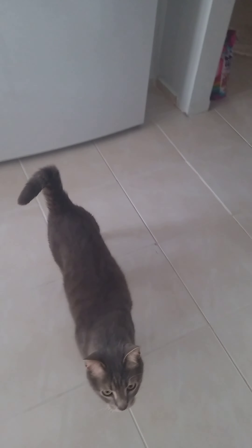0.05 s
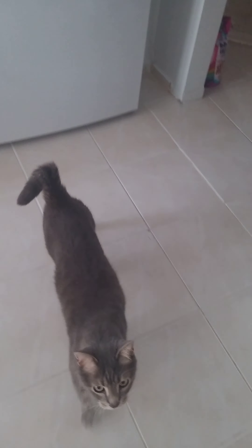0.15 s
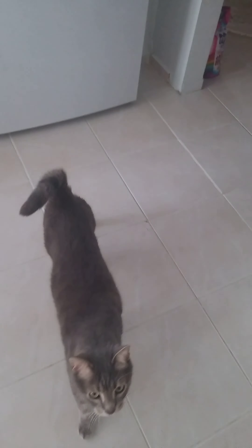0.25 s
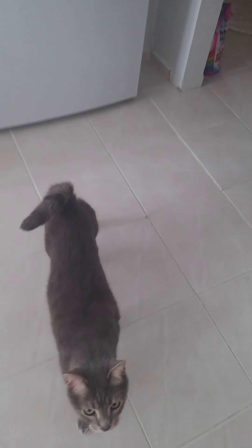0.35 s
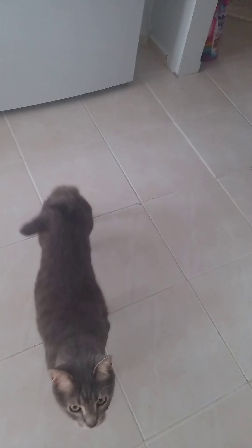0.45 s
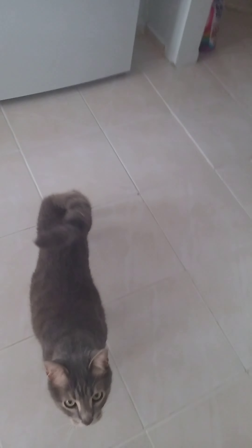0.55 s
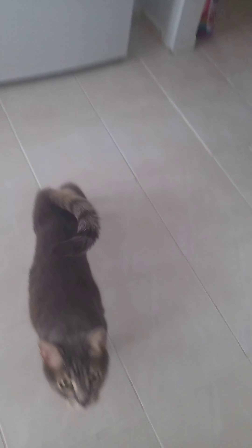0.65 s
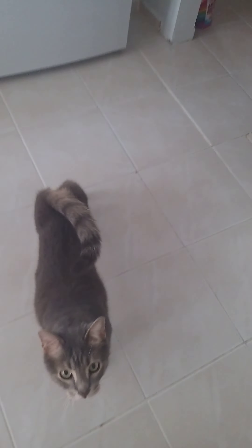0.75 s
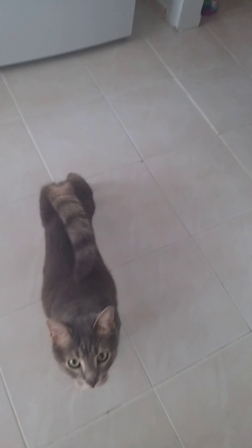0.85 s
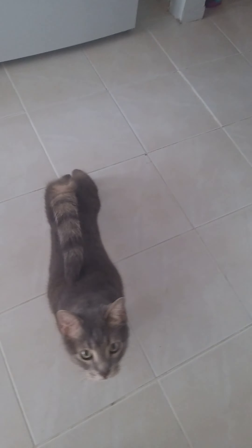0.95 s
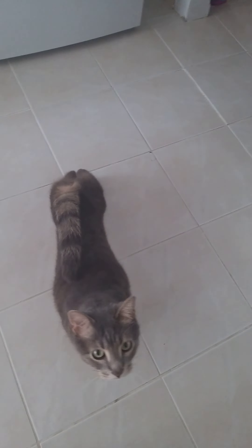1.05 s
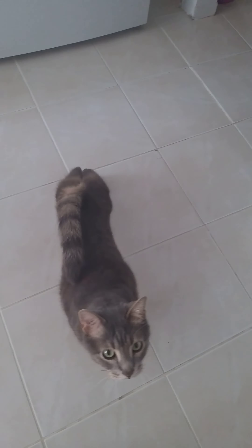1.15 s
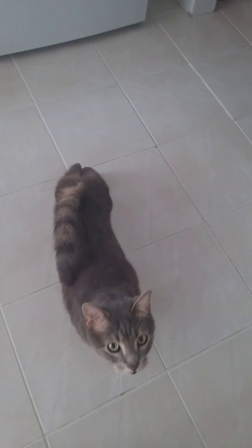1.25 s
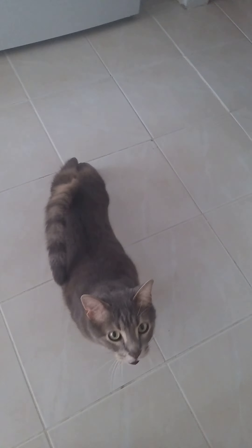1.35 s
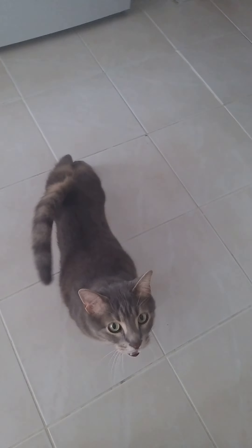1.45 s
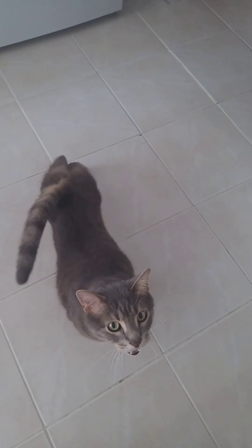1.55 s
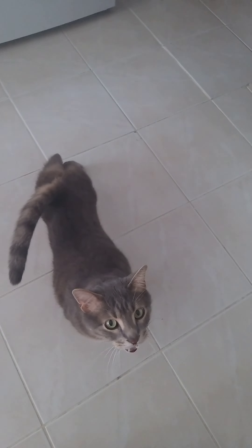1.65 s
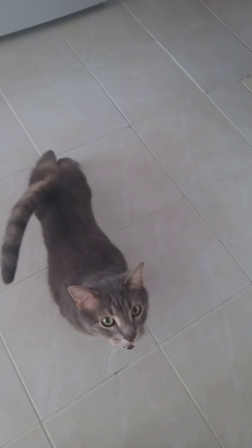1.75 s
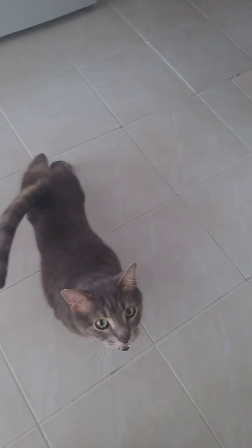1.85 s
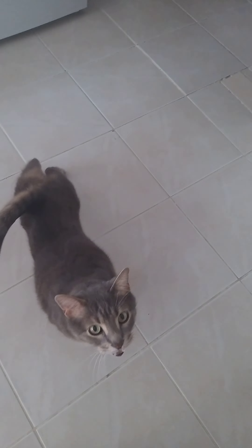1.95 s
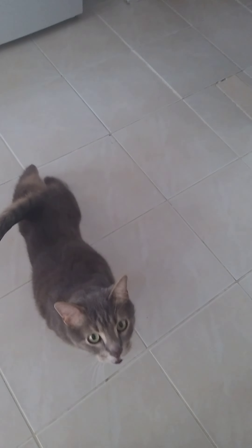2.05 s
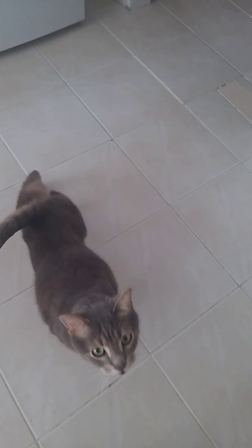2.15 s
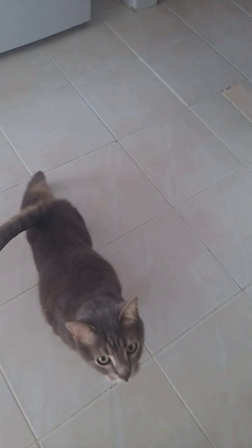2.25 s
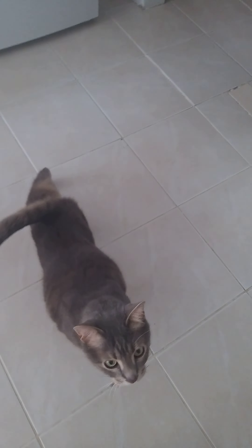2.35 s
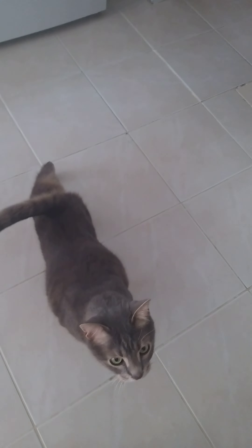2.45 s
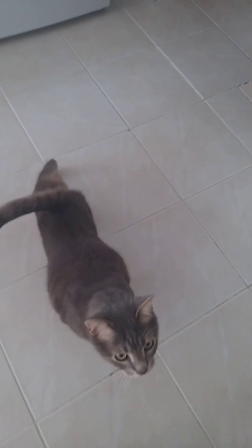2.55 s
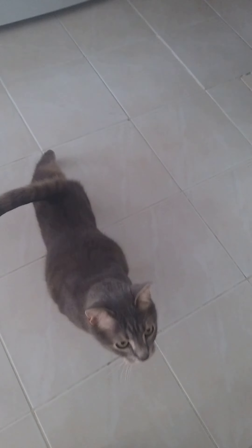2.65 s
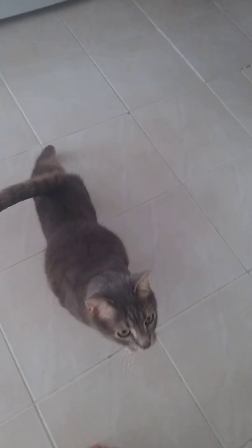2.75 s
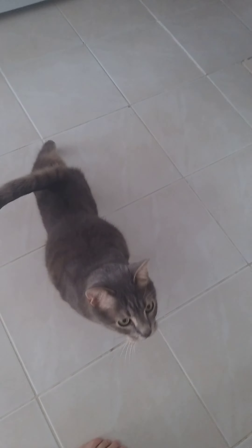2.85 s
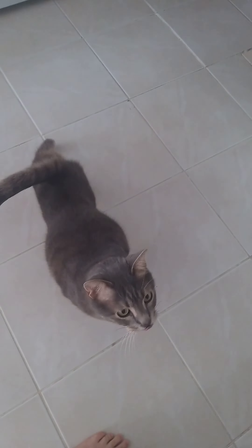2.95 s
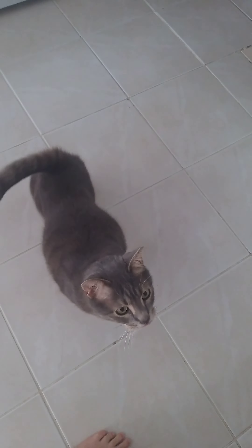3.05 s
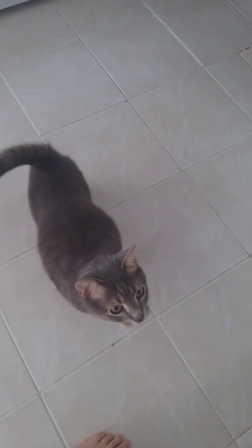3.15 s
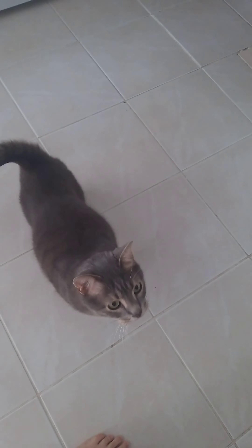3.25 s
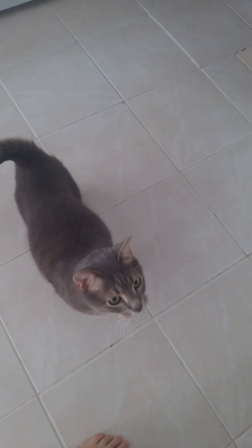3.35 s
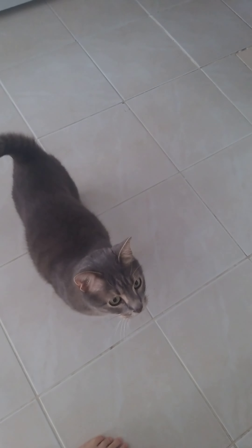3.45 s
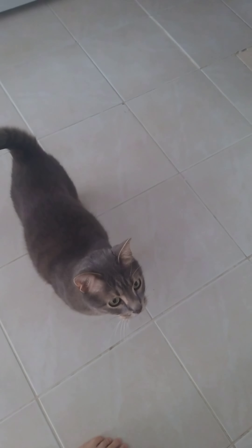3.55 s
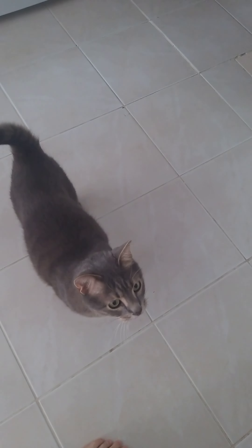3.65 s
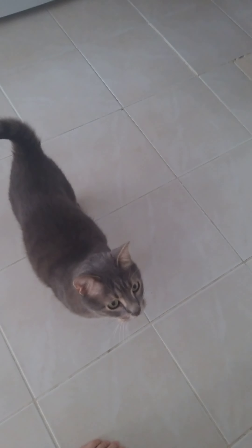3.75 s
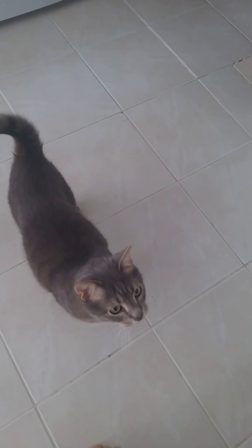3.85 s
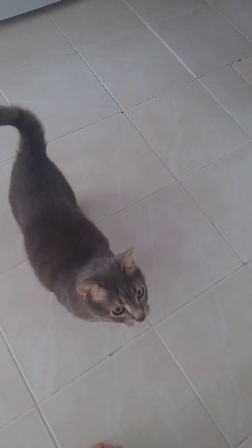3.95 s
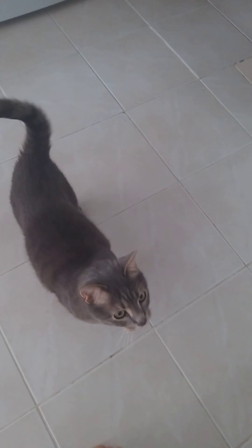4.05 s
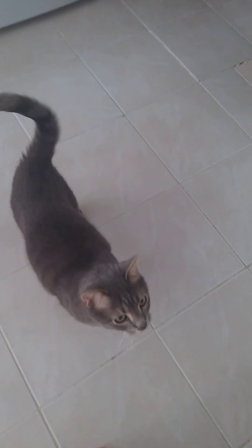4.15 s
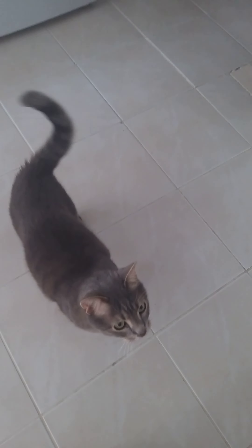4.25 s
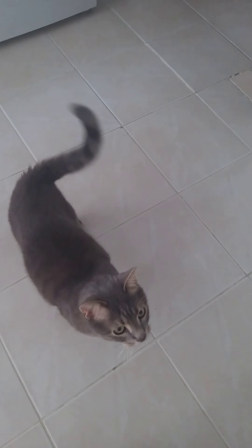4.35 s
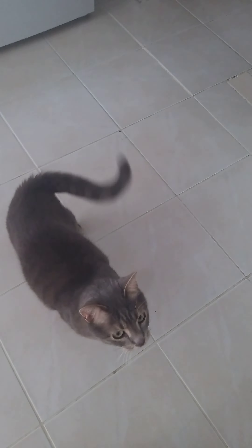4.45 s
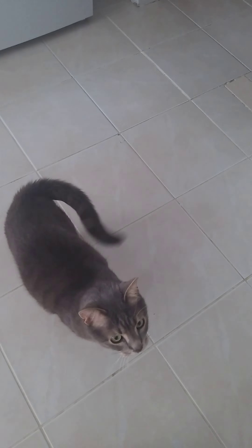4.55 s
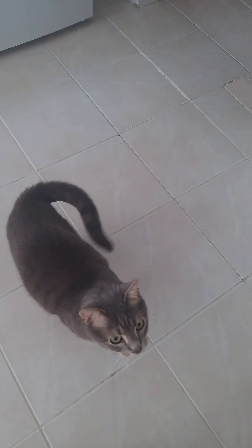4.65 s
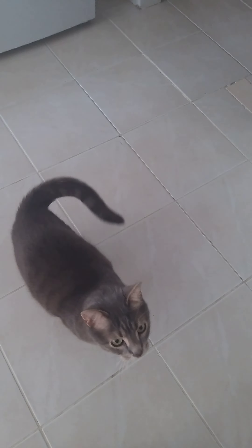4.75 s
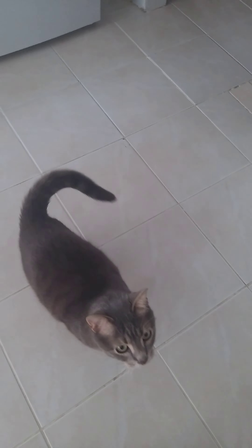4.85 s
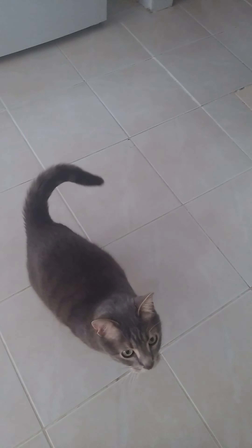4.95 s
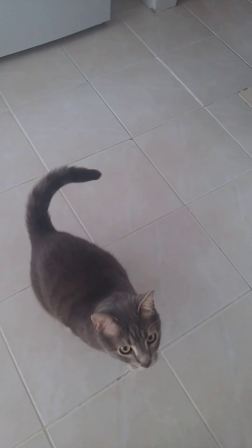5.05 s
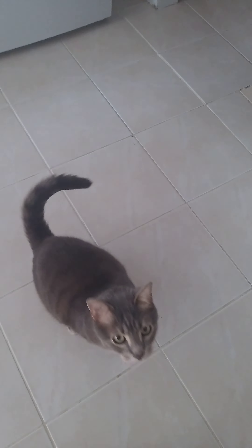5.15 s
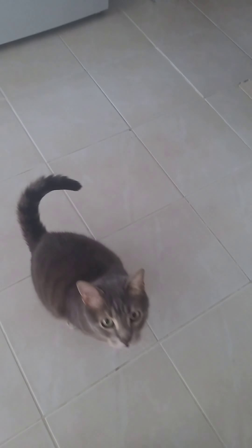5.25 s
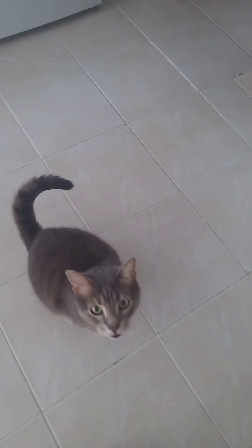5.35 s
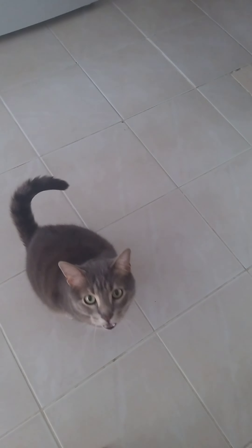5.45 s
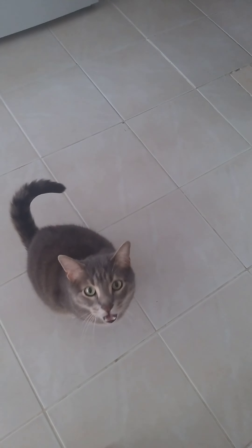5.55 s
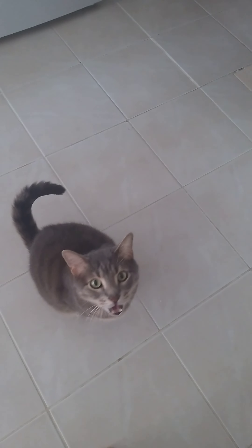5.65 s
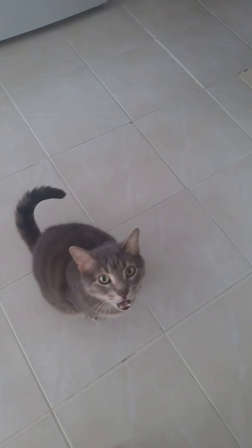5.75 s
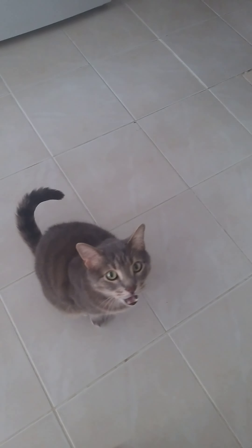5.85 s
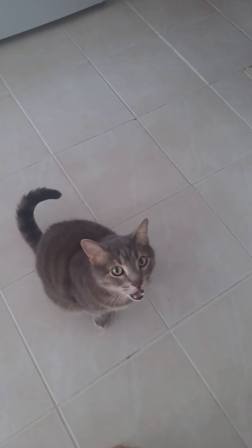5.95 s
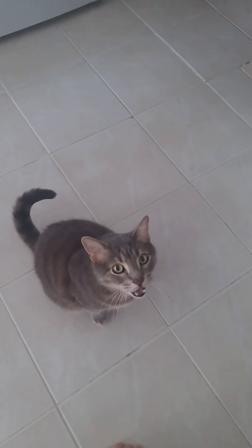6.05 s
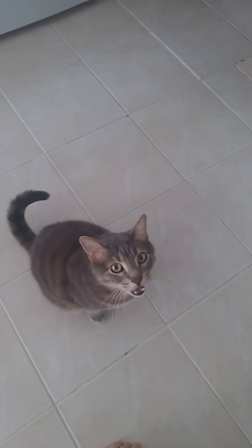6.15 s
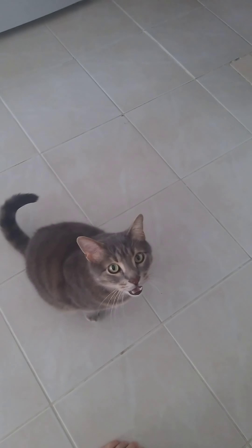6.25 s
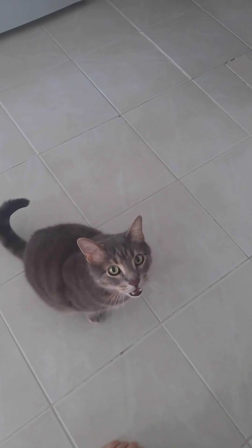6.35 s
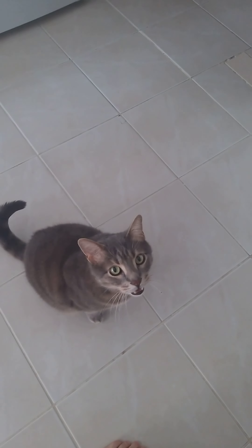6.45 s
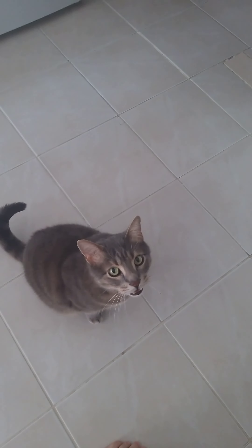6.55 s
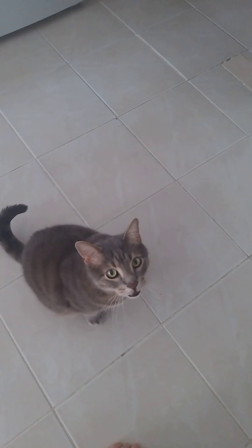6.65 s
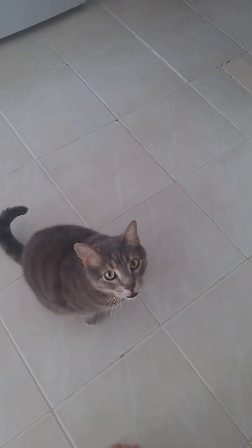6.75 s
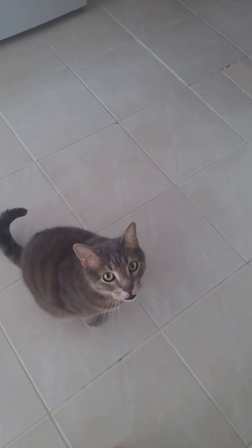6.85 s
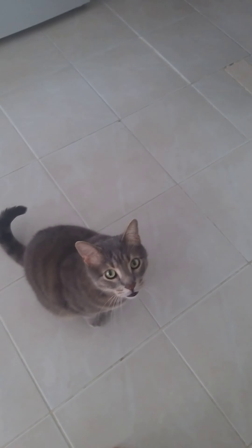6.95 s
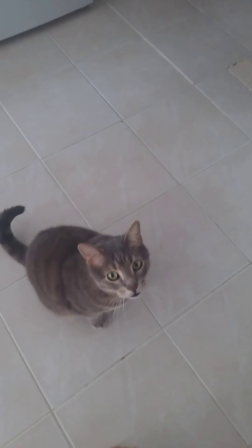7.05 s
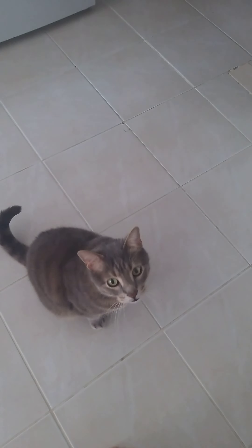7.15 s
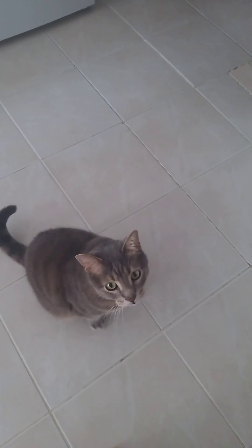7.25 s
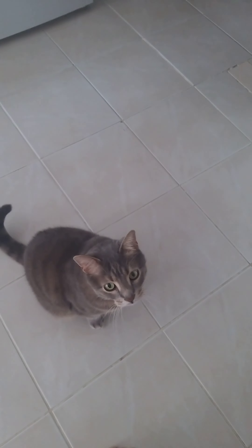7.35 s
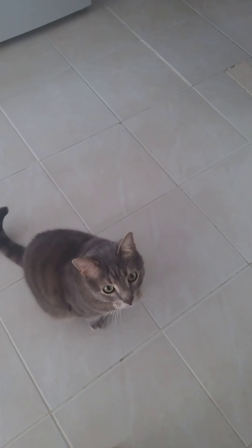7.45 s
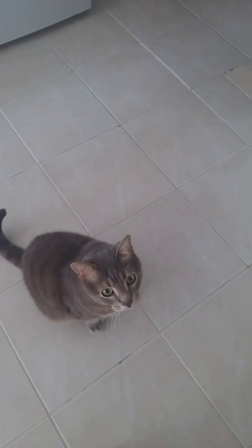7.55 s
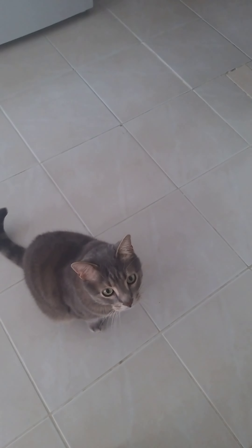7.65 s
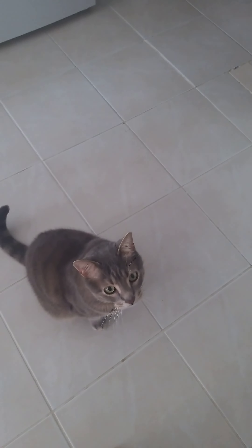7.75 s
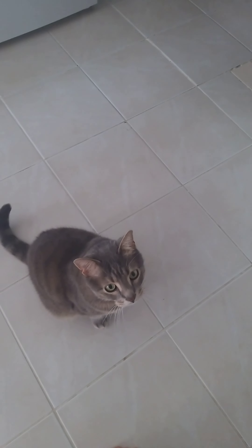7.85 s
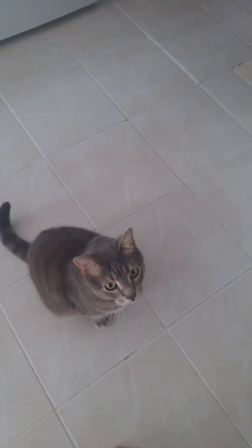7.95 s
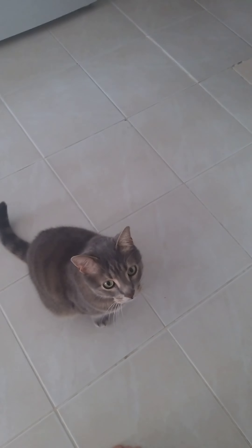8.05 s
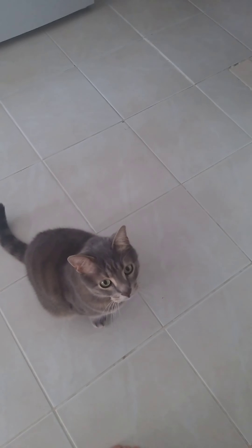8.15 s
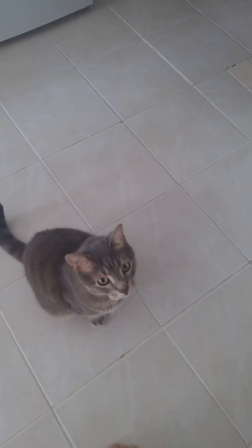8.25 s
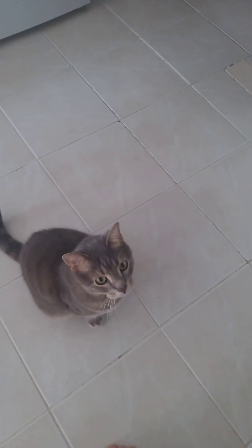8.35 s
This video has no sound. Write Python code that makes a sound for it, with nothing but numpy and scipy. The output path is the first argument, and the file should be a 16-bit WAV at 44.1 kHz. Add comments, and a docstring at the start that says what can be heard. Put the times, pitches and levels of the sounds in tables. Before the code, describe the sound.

A nearby cat gives two long meows in an echoing kitchen, with clanks, knocks and clattering crockery over a fridge hum.

```python
"""A fridge hums over the room tone of a tiled kitchen; some way off, metal clanks and clicks.
A nearby cat meows twice: overtones of its vocal folds, shaped by a mouth that opens and closes.
Taps, knocks and a clatter of crockery follow the first meow; the blows crack and rattle, all but the
taps ring, and most is echo. Two microphone ports of a phone pick it all up, the left one muffled."""
import sys
import numpy as np
from scipy import signal
from scipy.fft import rfft, irfft
from scipy.io import wavfile

SR = 44100
rng = np.random.default_rng(int(sys.argv[2]) if len(sys.argv) > 2 else 0)


def output_pcm(signal):
    """Save a mono or channel-first signal as 16-bit PCM at the path in sys.argv[1].

    Samples are clipped to [-1, 1] before scaling.
    """
    pcm = np.clip(np.atleast_2d(signal).T, -1, 1) * 32767
    wavfile.write(sys.argv[1], SR, np.round(pcm).astype(np.int16))


N = 369999
LEFT_LAG_SAMPLES = 14
# modes of the knocked object, a midrange ring: (frequency [Hz], gain [dB], t60 [s])
KNOCK_MODES = [(346, 0.5, 0.13), (742, 2.5, 0.1), (1440, -20, 0.22), (1584, 1, 0.14), (1675, -8, 0.17),
               (2110, -13, 0.092), (2880, -3, 0.08), (3030, -26, 0.058), (3600, -12.5, 0.13),
               (4050, -20, 0.16), (5100, -14, 0.22), (5500, -14, 0.11)]


def from_db(db):
    """Level to amplitude gain."""
    return 10 ** (np.asarray(db) / 20)


def unit_rms(x):
    """Scale to rms 1."""
    return x / np.sqrt(np.mean(x ** 2) + 1e-20)


def at_hz(points, hz):
    """Read a (frequency, value) table on a log axis."""
    points_hz, values = np.transpose(points)
    return np.interp(np.log(hz + 1), np.log(points_hz), values)


def drift(rate_hz, count):
    """Slow random motion: noise through two one-pole low-passes, rms 1."""
    pole = np.exp(-2 * np.pi * rate_hz / SR)
    noise = rng.standard_normal(count + 8000)
    return unit_rms(signal.lfilter([1], [1, -2 * pole, pole * pole], noise)[8000:])


def band(x, low_hz, high_hz):
    """Butterworth band-pass."""
    return signal.sosfilt(signal.butter(3, [low_hz, high_hz], "band", fs=SR, output="sos"), x)


def diffuse(count):
    """Left and right spectra of diffuse noise, most alike in the bass, and their frequencies."""
    # likeness at the two ports: (frequency [Hz], coherence [0-1])
    coherence = [(60, 0.97), (300, 1), (700, 0.35), (1500, 0.16), (4000, 0.06), (15000, 0.68)]
    hz = np.fft.rfftfreq(count, 1 / SR)
    mid, side = rfft(rng.standard_normal((2, count)))
    alike = np.clip(at_hz(coherence, hz), 0, 1)
    return np.sqrt(1 + alike) * mid + np.sqrt(1 - alike) * side * [[1], [-1]], hz


def room_tone(level_db=-55, waver_db=0.5):
    """Broad, diffuse noise of the house, slightly uneven in level."""
    # noise spectrum: (frequency [Hz], relative density [dB])
    floor = [(18, -47), (30, 1.5), (69, -8), (88, -8), (203, -2), (278, -5), (309, 3), (334, -4.5),
             (434, -7), (626, -10), (1570, -27), (2140, -36), (2860, -28), (4470, -30.5), (15700, -31.5)]
    # humps on it: (centre [Hz], width [Hz], height [dB])
    humps = [(2240, 190, 12.5), (3140, 420, -12.5), (4990, 690, 8), (8600, 230, 4.5), (10040, 940, 5.5),
             (12000, 140, 11)]
    spectra, hz = diffuse(N + N % 2)
    humps_db = sum(db * np.exp(-((hz - centre) / width) ** 2) for centre, width, db in humps)
    noise = irfft(spectra * from_db(at_hz(floor, hz) + humps_db))[:, :N]
    return from_db(level_db + waver_db * drift(12, N)) * unit_rms(noise)


def fridge(steady_hz=700):
    """Compressor hum and a thin whine; the low lines waver most."""
    # hum lines: (frequency [Hz], level [dB])
    lines = [(41, -71.5), (62, -75.5), (99, -73.5), (146, -75.5), (195, -81), (308, -71.5), (370, -69),
             (431, -65.5), (496, -76.5), (2184, -87), (4376, -74.5)]
    t = np.arange(N) / SR
    wander = [np.repeat(drift(183, N // 30 + 1), 30)[:N] / (1 + hz / steady_hz) for hz, _ in lines * 2]
    hum = sum(from_db(db + 6 * swell) * np.sin(2 * np.pi * hz * t + 1.18 * slip)
              for (hz, db), swell, slip in zip(lines, wander, wander[len(lines):]))
    return np.sqrt(2) * hum * from_db([[-2], [2]])  # louder on the right


def blows(events, colours_db, modes, ring_db, crack=5.0, spread_db=2.5):
    """Each blow cracks, rattles as decaying noise and kicks the given modes; gives (rattle, ring)."""
    # events: (time [s], level [dB], thump below 500 Hz [dB], tilt [dB/octave], rattle t60 [s])
    # rattle bands, one per entry of colours_db: (low [Hz], high [Hz])
    bands = [(45, 130), (130, 500), (500, 1800), (1800, 2900), (2900, 4500), (4500, 8000), (8000, 13000)]
    rattle, ring = np.zeros((2, N))
    kicks = np.zeros((len(modes), N))
    modes_hz = np.array(modes)[:, 0]
    for time_s, db, thump_db, tilt, t60_s in events:
        def tilted_db(hz):
            return db + tilt * np.log2(np.maximum(hz, 1000) / 1000)
        start = round(time_s * SR)
        t = np.arange(min(SR // 8, N - start)) / SR
        decay = from_db(-60 * t / max(t60_s, .002))
        bursts = rng.standard_normal((len(bands), SR // 8))[:, :len(t)] * decay
        bursts[:, 0] = crack * (-1) ** np.arange(len(bands))  # alternate signs: bands join without gaps
        for burst, colour_db, (low, high) in zip(bursts, colours_db, bands):
            part = band(burst, low, high)
            band_db = thump_db if high <= 500 else tilted_db(np.sqrt(low * high))
            gain = from_db(band_db + colour_db) / np.sqrt(np.sum(part ** 2))
            rattle[start:start + len(t)] += gain * part
        kicks[:, start] = from_db(tilted_db(modes_hz) + ring_db + rng.normal(0, spread_db, len(modes)))
    for kick, (hz, db, t60_s) in zip(kicks, modes):
        radius, angle = from_db(-60 / (t60_s * SR)), 2 * np.pi * hz / SR
        feedback = [1, -2 * radius * np.cos(angle), radius * radius]
        ring += signal.lfilter([0, from_db(db) * np.sin(angle)], feedback, kick + 1e-18)
    return np.array([rattle, ring])


def clanks():
    """Two hard blows in quick succession."""
    events = [(0.6068, -36.5, -34, 0.55, 0.076), (0.6537, -35, -33.5, -2, 0.025)]  # columns as in blows()
    colours_db = [-9.5, 0, -2, -15, -6, -4, -9]  # rattle gain per band [dB]
    modes = [(297, -2.5, 0.24), (1045, -1.5, 0.13), (2090, -8, 0.1), (3800, -11, 0.14), (4160, 7, 0.076),
             (4520, -4, 0.088), (5200, -3, 0.1), (5570, -1, .15), (7090, 2, 0.073), (7360, -21, 0.18),
             (8700, -1.5, 0.082), (13010, -28, .15)]  # (frequency [Hz], gain [dB], t60 [s])
    return blows(events, colours_db, modes, ring_db=-30.5)


def clicks():
    """Two light, bright blows."""
    events = [(0.8691, -53.5, -46, 0.7, 0.048), (1.0009, -51.5, -49, -2, 0.0043)]  # columns as in blows()
    colours_db = [1, 1, 2.5, -7.5, 5.5, 11.5, 7.5]  # rattle gain per band [dB]
    modes = [(2040, 0, 0.029), (3380, -27, 0.17), (5820, 0, 0.074), (6740, -6, 0.02), (10900, 14, 0.025),
             (12000, -19, .08)]  # (frequency [Hz], gain [dB], t60 [s])
    return blows(events, colours_db, modes, ring_db=-20)


def meow(gesture, treble, breath_db=-24, strain=0.7, flutter_db=0.5, hop=32):
    """Vocal-fold overtones under six tract resonances; weak voicing is breathy."""
    # fold pulse spectrum: gain of harmonics 1-24 [dB]
    harmonics_db = [-6, -2.5, 3, 6.5, 6.5, -0.5, 2, 7.5, 2, 4, 1.5, 5.5, 1.5, 5, 6, 5.5, -1.5, -2.5, -2.5,
                    0.5, -4, -18, 2, -15]
    start_s, end_s = gesture[0][0], gesture[-1][0]
    start, count = round(start_s * SR), round((end_s - start_s) * SR)
    n = np.arange(count)

    def tracks(table):
        times_s, *columns = np.transpose(table)
        return [np.interp((start + n) / SR, times_s, column) for column in columns]
    pitch_hz, mouth_hz, mouth_db, nose_db = tracks(gesture)
    palate_db, teeth_db = tracks(treble)
    # chest, throat and hiss follow the mouth, relative to a loud, half-open one
    effort_db, opening_khz = mouth_db + 40, (mouth_hz - 2200) / 1000
    chest_db = -51 + .05 * effort_db - 12.5 * opening_khz
    throat_db = -55.5 + .35 * effort_db + 23 * opening_khz
    hiss_db = -67.5 + .19 * effort_db + 5.1 * opening_khz
    # (level [dB], centre [Hz], width [Hz])
    resonances = [(chest_db, 340, 200), (nose_db, 730, 200), (throat_db, 1150, 400),
                  (mouth_db, mouth_hz[::hop], 550), (palate_db, 3450, 520), (teeth_db, 5550, 1750)]
    weakness = from_db(strain * (mouth_db.max() - mouth_db))
    ragged_onset = from_db(22) * np.exp(-n / SR / .09)
    jitter = .004 * drift(22, count) + .003 * drift(120, count)
    phase = 2 * np.pi * np.cumsum(pitch_hz * (1 + jitter)) / SR
    voice = from_db(hiss_db) * unit_rms(band(rng.standard_normal(count), 7800, 15500))  # air past teeth
    for k, harmonic_db in enumerate(harmonics_db, 1):
        harmonic_hz = k * pitch_hz[::hop]
        density = sum(from_db(2 * db[::hop]) / width / (1 + (2 * (harmonic_hz - hz) / width) ** 2) ** 2
                      for db, hz, width in resonances)
        power = np.interp(n, n[::hop], density * pitch_hz[::hop])
        rasp = from_db(breath_db) * (ragged_onset + weakness * k / 8) * drift(160, count)
        gain = from_db(harmonic_db + flutter_db * min(k, 6) * drift(14, count))
        voice += gain * np.sqrt(power) * (1 + rasp) * np.sin(k * phase + rng.uniform(0, 2 * np.pi))
    out = np.zeros(N)
    out[start:start + count] = voice * signal.windows.tukey(count, .03)
    return out


def cat():
    """Two meows; the mouth opens wide, then closes while the nose takes over."""
    # voice gestures: (time [s], pitch [Hz], mouth resonance [Hz], mouth [dB], nose [dB])
    gesture_1 = [(1.2, 299, 1600, -83, -63), (1.24, 292.2, 1760, -48.5, -58),
                 (1.275, 290, 1810, -47.5, -52), (1.34, 333.6, 2100, -38, -43.5),
                 (1.48, 354.8, 2420, -40, -48), (1.534, 342.3, 2470, -41, -43.5),
                 (1.7, 354, 2500, -41, -52.5), (1.85, 367, 2234, -42, -36.5),
                 (1.885, 376.8, 2250, -41, -37), (1.95, 382.2, 2050, -43.5, -46),
                 (2.0, 380.5, 1940, -55, -42.5), (2.04, 378.7, 1900, -48.5, -39),
                 (2.17, 371.5, 2010, -45, -35.5), (2.3, 351.2, 2100, -54, -51),
                 (2.39, 337.5, 1960, -62.5, -50), (2.44, 323, 1913, -51, -54),
                 (2.58, 314.7, 2133, -82, -88)]
    gesture_2 = [(5.23, 252, 1650, -70, -72), (5.28, 261.2, 1680, -51, -58),
                 (5.335, 304.2, 1780, -44.5, -48), (5.44, 339, 2350, -39.5, -42.5),
                 (5.5, 342.4, 2440, -48, -41), (5.61, 349, 2440, -38.5, -46.5),
                 (5.78, 363.4, 2440, -41.5, -38.5), (5.84, 374.6, 2380, -38.5, -34),
                 (6.0, 383, 2322, -37.5, -45.5), (6.2, 372.2, 2105, -40, -32.5),
                 (6.35, 364.2, 2040, -46, -41), (6.49, 345.5, 2000, -57, -49.5),
                 (6.65, 339.5, 1721, -63, -47), (6.73, 332, 1900, -56, -49),
                 (6.89, 309.1, 1877, -55.5, -58), (6.99, 296, 1820, -60, -61),
                 (7.08, 300.4, 1796, -86, -84)]
    # upper resonances: (time [s], palate [dB], teeth [dB])
    treble_1 = [(1.2, -82, -81), (1.25, -68, -56), (1.35, -57.5, -64), (1.52, -45.5, -46.5),
                (1.84, -55, -46.5), (1.96, -52.5, -66), (2.17, -56, -54), (2.35, -68, -65.5),
                (2.44, -56, -54), (2.58, -76, -97.5)]
    treble_2 = [(5.23, -90, -78), (5.29, -72, -56), (5.44, -52.5, -56.5), (5.54, -44, -49.5),
                (5.6, -37.5, -49), (5.66, -46, -43.5), (5.78, -45, -52), (6.0, -54, -50.5),
                (6.3, -59, -53.5), (6.62, -69, -66.5), (6.82, -59, -59), (7.079, -79, -78)]
    return meow(gesture_1, treble_1) + meow(gesture_2, treble_2)


def taps():
    """Faint, scattered blows with no audible ring."""
    events = [(2.7914, -62.5, -71, -1, 0.0061), (2.9905, -65, -67, 0.5, 0.01),
              (3.3283, -60.5, -61, -14, 0.013), (3.5934, -70, -74, -6, 0.013),
              (6.949, -54.5, -48, -1.2, 0.0041)]  # columns as in blows()
    colours_db = [-10, -2.5, 2, -24, -3, -2.5, -3]  # rattle gain per band [dB]
    return blows(events, colours_db, KNOCK_MODES, ring_db=-62)  # modes inaudible at this level


def knocks():
    """Five quick blows with a midrange ring."""
    events = [(4.503, -34.5, -45, -0.45, 0.022), (4.5846, -39.5, -45, -2.5, 0.078),
              (4.7467, -35, -40.5, 0.7, 0.059), (4.8435, -47, -50, -3., 0.013),
              (4.9076, -54.5, -48, 2, 0.0077)]  # columns as in blows()
    colours_db = [-0.5, -1, -0.5, -25, -11, -19, -8.5]  # rattle gain per band [dB]
    return blows(events, colours_db, KNOCK_MODES, ring_db=-36)


def clatter():
    """Crockery knocked together, ringing high."""
    events = [(6.7256, -59.5, -52.5, 1, 0.0031), (7.7848, -39, -52, 0.2, 0.02),
              (7.8401, -40, -57, -1.3, 0.0046), (8.0321, -43, -47.5, -6.5, 0.03),
              (8.1483, -51.5, -44.5, -6.5, 0.0056), (8.1991, -49, -49.5, -0.66, 0.0085),
              (8.3039, -40, -46, -2, 0.0017), (8.3718, -34.5, -39, -4., 0.018)]  # columns as in blows()
    colours_db = [-34, 0.5, -2, -0.5, 4, 2.5, 3.5]  # rattle gain per band [dB]
    modes = [(724, -14, 0.23), (3140, -4.5, 0.11), (3310, 0.5, 0.062), (3610, 0.5, 0.069), (3787, 3, 0.1),
             (4990, -11, .12), (5080, -16, 0.15), (5500, 0, 0.078), (5642, -12, 0.064), (6330, -17, 0.13),
             (7150, -6, 0.15), (7760, -16, 0.11), (8030, -6, 0.1), (11610, -3.5, 0.1), (14200, -1.5, 0.11)]  # (frequency [Hz], gain [dB], t60 [s])
    return blows(events, colours_db, modes, ring_db=-23)


def kitchen(x, build_s):
    """Diffuse echoes that build quickly and die octave by octave."""
    # reverberation: (frequency [Hz], t60 [s])
    decay_times = [(100, 0.6), (500, 0.38), (2000, 0.49), (6000, 0.3), (14000, 0.22)]
    spectra, hz = diffuse(SR)
    t = np.arange(SR) / SR
    build = 1 - np.exp(-t / build_s)
    edges_hz = 40 * 2. ** np.arange(10)
    echoes = 0
    for low, high in zip(edges_hz, edges_hz[1:]):
        decay = from_db(-60 * t / at_hz(decay_times, np.sqrt(low * high)))
        part = irfft(spectra * ((hz >= low) & (hz < high))) * decay * build
        energy_share = (high - low) / (SR / 2)
        echoes += part * np.sqrt(energy_share / (np.sum(part ** 2) / 2))
    return signal.fftconvolve(x[None], echoes)[:, :N]


def near_ports(x, bass_hz=900, tile_db=-5, tile_lags_samples=(70, 84)):
    """The left port is shaded from the cat; the tiles send each port one strong early echo."""
    bass = signal.sosfiltfilt(signal.butter(2, bass_hz, fs=SR, output="sos"), x)
    # the lead cancels the lag in record(): bass reaches both ports together
    left = from_db(1.5) * np.roll(bass, -LEFT_LAG_SAMPLES) + from_db(-2.5) * np.roll(x - bass, 2)
    tile_echoes = np.array([np.roll(x, lag) for lag in tile_lags_samples])
    return np.array([left, x]) + from_db(tile_db) * tile_echoes


def scene():
    """The cat is near and mostly direct, the blows far and mostly echo."""
    meows = cat()
    rattles, rings = clanks() + clicks() + taps() + knocks() + clatter()
    near = near_ports(meows) + from_db(-8) * kitchen(meows, build_s=.005)
    direct = from_db(-12.5) * rattles + from_db(-0.5) * rings
    echoes = kitchen(rattles + from_db(0.5) * rings, build_s=.0018)
    far = from_db(30.5) * (direct + echoes)
    return near + far + room_tone() + fridge()


def record(dry):
    """The left port is late, muffled and faintly hissy; both lose deep bass and the very top."""
    left = np.concatenate([np.zeros(LEFT_LAG_SAMPLES), dry[0, :-LEFT_LAG_SAMPLES]])
    dull = signal.sosfilt(signal.cheby2(8, 30, 6900, fs=SR, output="sos"), left)
    treble = signal.sosfilt(signal.butter(2, 9500, "high", fs=SR, output="sos"), left)
    left = dull + from_db(-7.5) * treble + from_db(-93) * rng.standard_normal(N)
    ports = signal.sosfilt(signal.butter(4, 36, "high", fs=SR, output="sos"), [left, dry[1]])
    return signal.sosfilt(signal.ellip(14, .5, 70, 15750, fs=SR, output="sos"), ports)


dry = scene()
out = record(dry)
output_pcm(out)
```